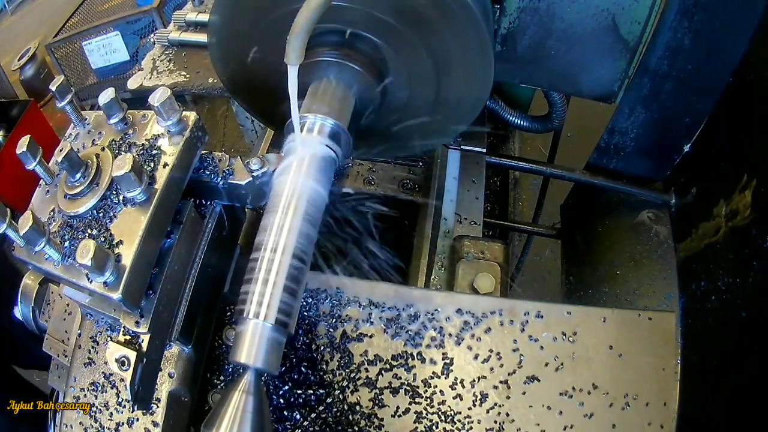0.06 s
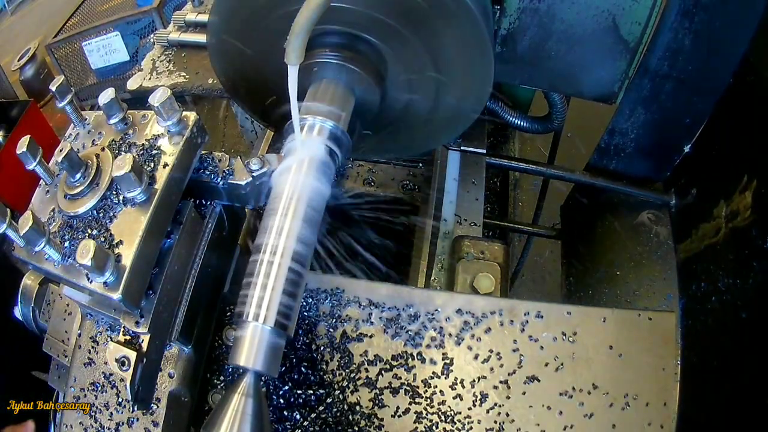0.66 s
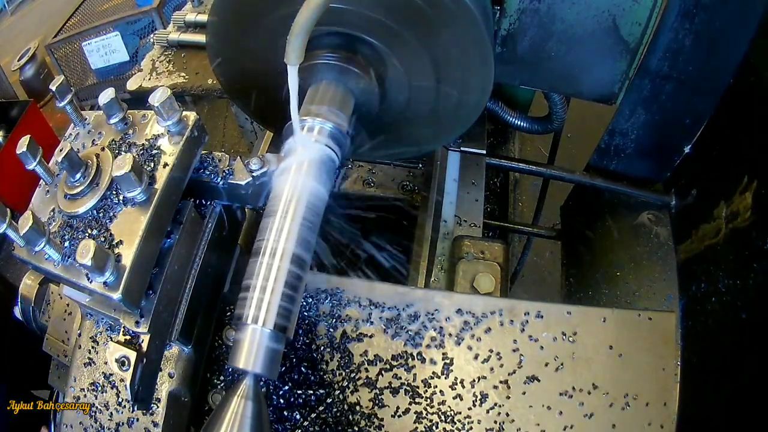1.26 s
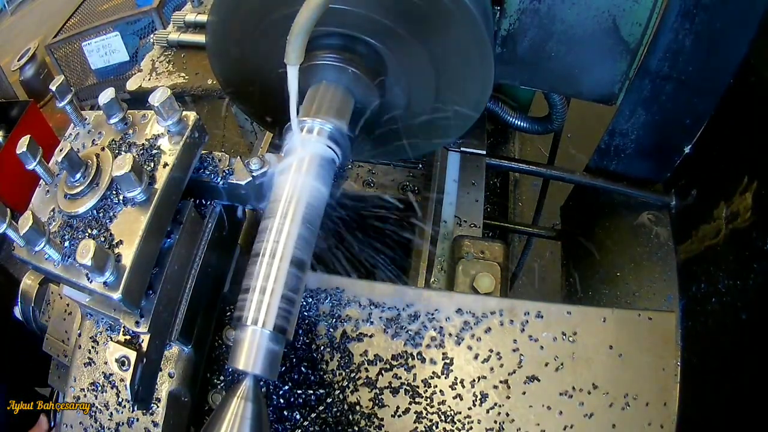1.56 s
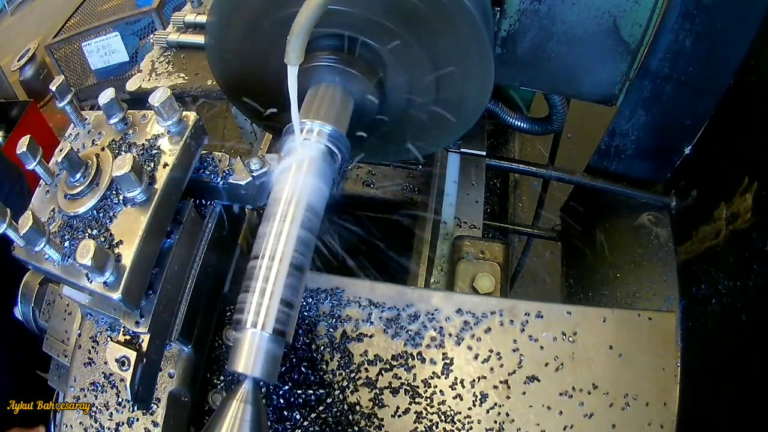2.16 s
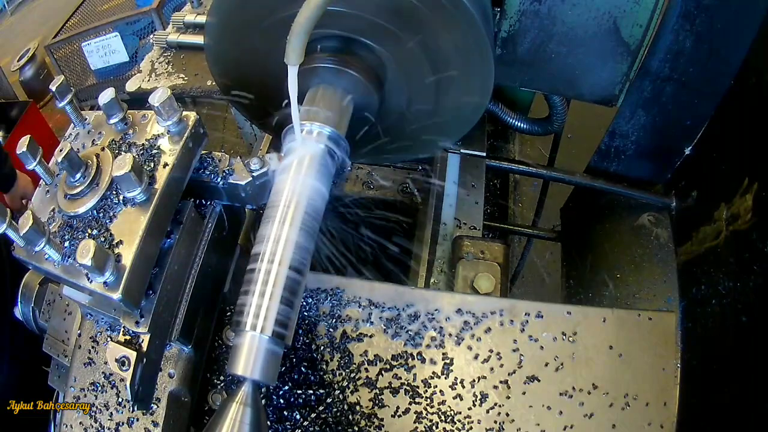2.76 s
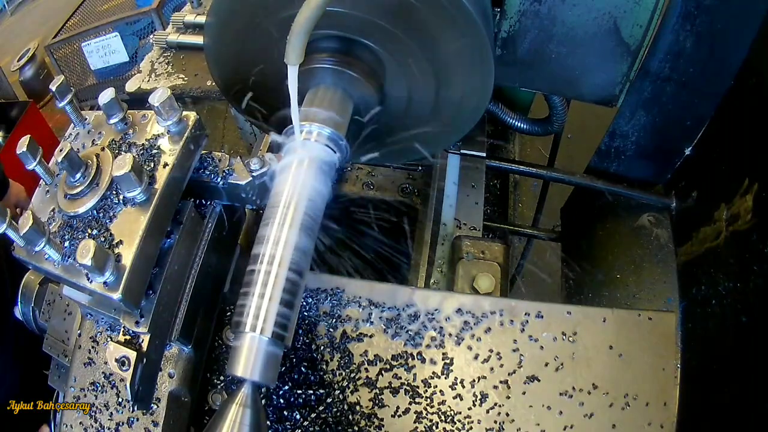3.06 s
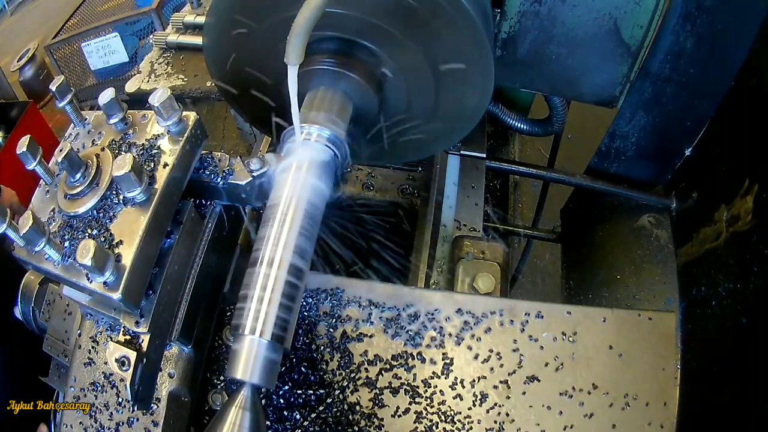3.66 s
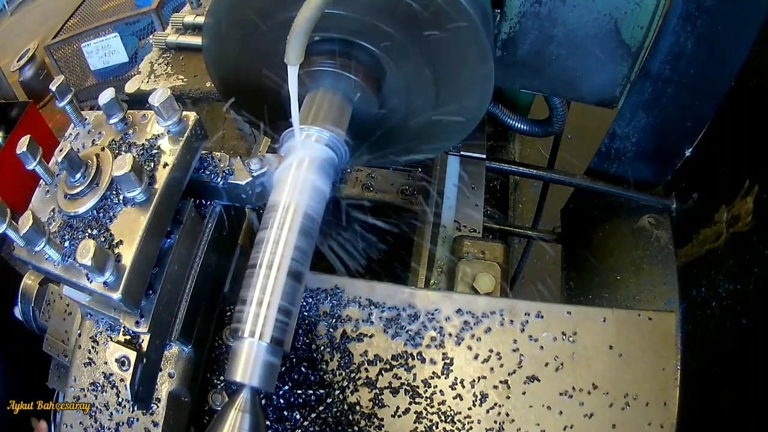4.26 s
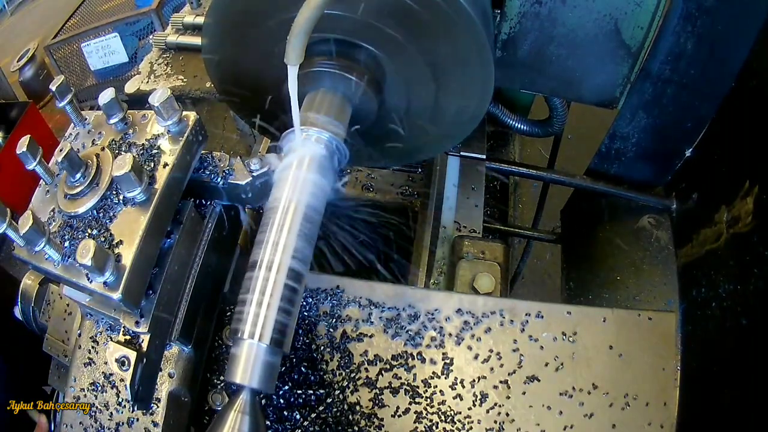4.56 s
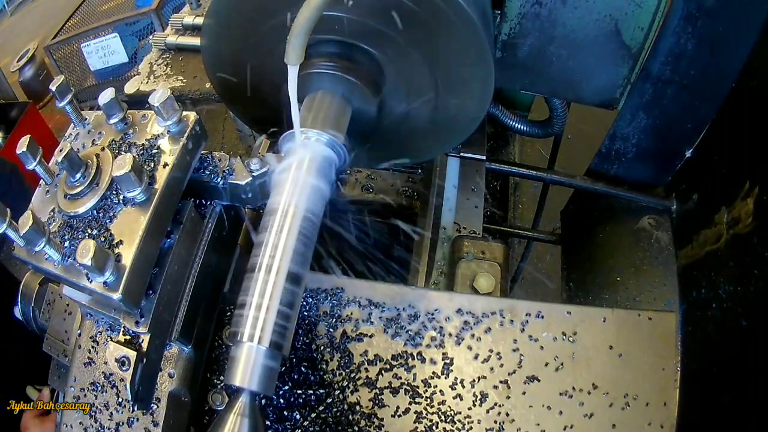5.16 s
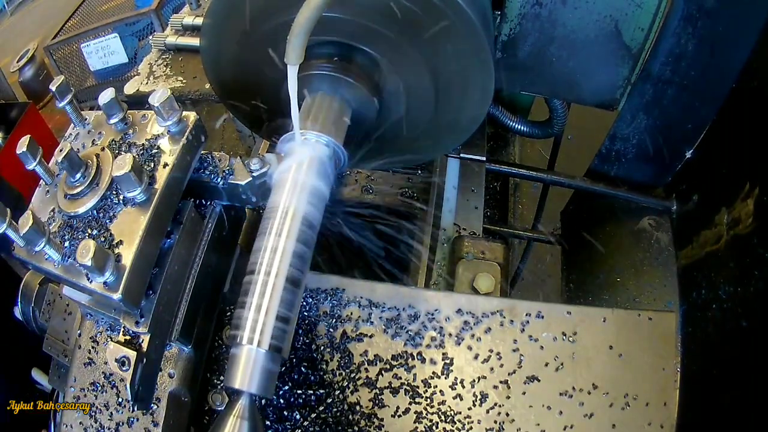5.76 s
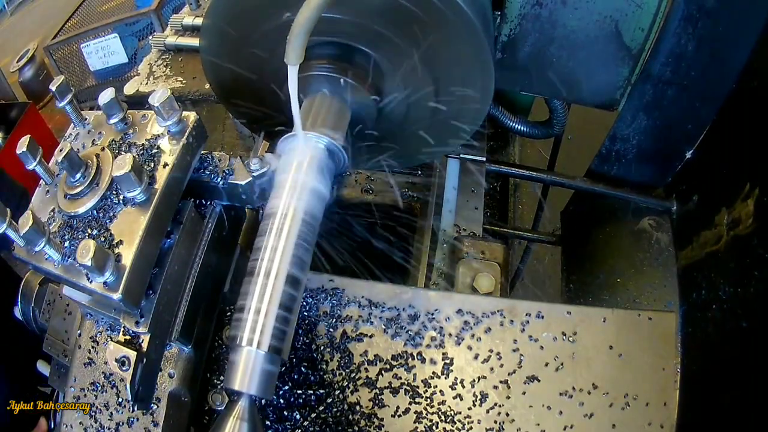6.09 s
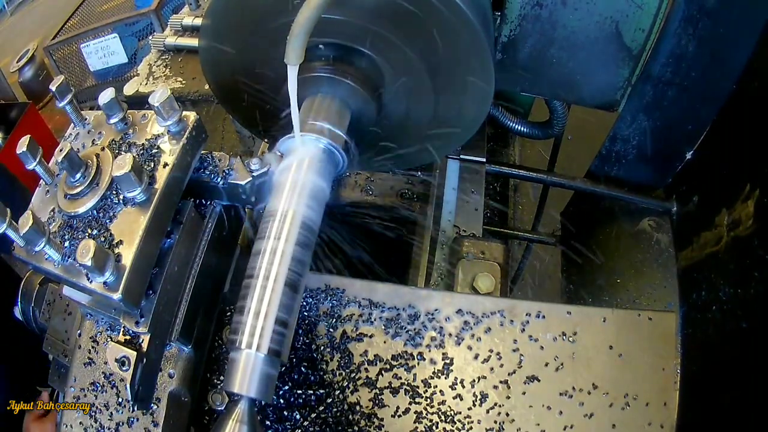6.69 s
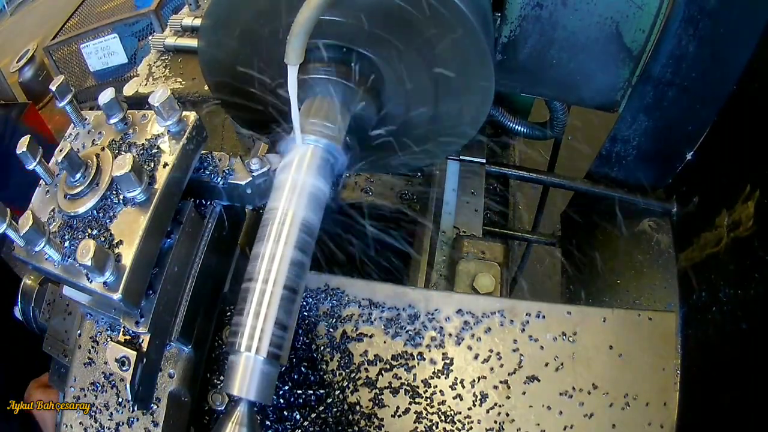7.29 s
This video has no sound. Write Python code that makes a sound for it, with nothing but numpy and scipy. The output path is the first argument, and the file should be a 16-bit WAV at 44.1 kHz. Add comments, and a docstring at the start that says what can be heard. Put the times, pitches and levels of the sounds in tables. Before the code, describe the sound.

A metal lathe turns a steel shaft with a steady gear whine and rattle, then a hoarse squeal and scraping chips near the end.

```python
"""Lathe turning a steel shaft under coolant.

Heard from close above the tool post. The headstock gears whine and rattle, the cut sizzles in the
tool's resonances, coolant hisses and chips tick on the guard. Near the end the thinning chip squeals,
the load eases, the drive speeds up a little and a caught chip scrapes round with the shaft."""
import sys
import numpy as np
from scipy import signal
from scipy.fft import rfft, irfft, next_fast_len
from scipy.io import wavfile
from scipy.ndimage import uniform_filter1d, minimum_filter1d, map_coordinates

SR = 44100
rng = np.random.default_rng(int(sys.argv[2]) if len(sys.argv) > 2 else 0)


def wrap_up_sound(samples):
    """Save the sound to the file named by the first command line argument, as 16-bit audio."""
    columns = np.atleast_2d(samples).T
    # keep every value between -1 and 1, then stretch to whole-number steps
    tamed = np.clip(columns, -1, 1)
    steps = np.round(tamed * 32767).astype(np.int16)
    wavfile.write(sys.argv[1], SR, steps)


N = 332073
SPINDLE_HZ = 13.7

# drive speed: time_s, tooth_rate_hz
DRIVE_SPEED = [(0, 116.75), (6.3, 116.75), (7.1, 117.65), (7.53, 117.65)]
# spray of coolant and fine chips: time_s, relative_db
SPRAY_LEVEL = [(0, -78.5), (5.0, -75.5), (5.95, -69), (6.35, -61.5), (6.85, -60.5), (7.53, -64)]


def amp(db):
    """Decibels to gain."""
    return 10 ** (np.asarray(db) / 20)


def unit(x):
    """Scale to rms 1."""
    return x / np.sqrt(np.mean(x ** 2) + 1e-20)


def noise():
    """White noise, rms 1."""
    return rng.standard_normal(N)


def curves(rows):
    """Per-sample curve for each column after time_s."""
    time_s, *columns = np.transpose(rows)
    return [np.interp(np.arange(N) / SR, time_s, column) for column in columns]


def wobble(rate_hz):
    """Smooth random curve through rate_hz knots a second."""
    knots = rng.standard_normal(int(N * rate_hz / SR) + 4)
    coarse = np.arange(0, N, 16)
    return np.interp(np.arange(N), coarse, map_coordinates(knots, [coarse * rate_hz / SR]))


def crackle(rate_hz, spread_db):
    """Random tiny impacts of uneven size, rms 1."""
    hits = rng.random(N) < rate_hz / SR
    return unit(hits * rng.choice([-1, 1], N) * amp(spread_db * np.minimum(noise(), 2)))


def body(x, response):
    """x through a resonant body (rows of freq_hz, gain_db), scaled to rms 1."""
    freq_hz, gain_db = np.transpose(response)
    size = 16384
    bins_hz = np.fft.rfftfreq(size, 1 / SR)
    gain = amp(np.interp(np.log(bins_hz + 1), np.log(freq_hz), gain_db, right=-110))
    cepstrum = irfft(np.log(gain))
    cepstrum[1:size // 2] *= 2  # fold to minimum phase
    cepstrum[size // 2 + 1:] = 0
    ring = irfft(np.exp(rfft(cepstrum)))
    return unit(signal.fftconvolve(np.pad(x, (size - 1, 0), mode="wrap"), ring, "valid"))


def reflections(x, t60_s, wet_db):
    """Add dense, short echoes from the steel faces all round."""
    t = np.arange(SR // 8) / SR
    tail = rng.standard_normal(len(t)) * amp(-60 * t / t60_s)
    return x + amp(wet_db) * signal.fftconvolve(x, tail / np.linalg.norm(tail))[:N]


def load():
    """Cutting load, 1 to 0; the drive runs slower under it."""
    tooth_hz, = curves(DRIVE_SPEED)
    return np.interp(tooth_hz, [DRIVE_SPEED[0][1], DRIVE_SPEED[-1][1]], [1, 0])


def gear_tone(phase, waver_db):
    """Tone of randomly wavering strength, rms 1."""
    return unit(amp(waver_db * wobble(7)) * np.sin(phase + rng.uniform(0, 2 * np.pi)))


def gear_whine(tooth_phase):
    """Tones geared to one drive: tooth harmonic 4 holds, harmonic 5 throbs and fades with the load."""
    # motor and gear train at cutting speed: pitch_hz, rms_db
    train_tones = [(49.2, -51), (66.1, -58.5), (82.3, -49.5), (98.2, -42), (117.3, -41.5), (281.8, -43),
                   (294.0, -41), (324.4, -34.5), (353.1, -46), (363.4, -43.5), (379.5, -39), (392.7, -30.5),
                   (405.3, -41.5), (454.5, -35), (480.0, -31), (482.4, -31), (503.2, -27), (547.3, -32),
                   (601.6, -30.5), (603.1, -30.5), (605.4, -31), (619.7, -36.5), (648.7, -30.5),
                   (778.4, -40.5), (1131.0, -44), (1152.9, -43), (1167.4, -36), (1297.6, -41),
                   (1401.0, -38.5), (1452.7, -50.5), (1556.8, -46.5), (1621.5, -48.5), (2335.0, -49),
                   (2724.0, -71), (2996.6, -67.5), (3023.5, -65.5), (3050.3, -64.5), (3076.5, -57),
                   (6099.9, -72)]
    # two gears beating with the loudest mesh: offset_hz, first_swell_s
    beats = [(4.071, .094), (-4.919, .124)]
    # those two against the mesh: relative_db
    beat_levels = [-8, -10]
    t = np.arange(N) / SR
    mesh_phase = 5 * tooth_phase + rng.uniform(0, 2 * np.pi)
    neighbours = sum(amp(db) * np.sin(mesh_phase + 2 * np.pi * offset_hz * (t - swell_s))
                     for (offset_hz, swell_s), db in zip(beats, beat_levels))
    mesh_db = -18 - 8.5 * (1 - load()) + .9 * wobble(3)
    mesh = np.sqrt(2) * amp(mesh_db) * (np.sin(mesh_phase) + neighbours)
    held = amp(-21) * gear_tone(4 * tooth_phase, waver_db=.6)
    phase_per_hz = tooth_phase / DRIVE_SPEED[0][1]
    train = sum(amp(db) * gear_tone(hz * phase_per_hz, waver_db=1.5) for hz, db in train_tones)
    return mesh + held + train


def gear_rattle(tooth_phase):
    """Teeth clash in uneven bursts, shaking the casting, its covers and the bed."""
    # headstock casting: freq_hz, gain_db
    casting_response = [(12, -48.5), (28, -31.5), (50, -24.5), (100, -21.5), (135, -23), (200, -15),
                        (265, -16.5), (340, -12), (430, -6.5), (520, -5.5), (600, -1), (690, -10),
                        (790, -20.5), (950, -38.5), (1300, -81)]
    # sheet covers: freq_hz, gain_db
    cover_response = [(600, -40), (830, -8.5), (920, -9), (1060, -6.5), (1160, -0.5), (1320, -3.5),
                      (1520, 0.5), (1680, -15), (1820, -16), (1920, -11), (2150, -10.5), (2340, -14),
                      (2480, -23.5), (3200, -49.5)]
    # lathe bed: freq_hz, gain_db
    bed_response = [(12, -33), (28, -10.5), (48, -3.5), (100, -2.5), (220, 2), (400, -23), (900, -70)]
    clash = amp(2.2 * np.cos(tooth_phase) + 1.4 * wobble(45)) * noise()
    casting = amp(-19.5 + 1.2 * load()) * body(clash, casting_response)
    buzz = amp(.66 * np.cos(tooth_phase) + wobble(60)) * noise()
    covers = amp(-29) * body(buzz, cover_response)
    swell_s, width_s = 6.54, .29  # the bed swells as the cut runs out
    rumble_db = -42.6 + 12 * np.exp(-((np.arange(N) / SR - swell_s) / width_s) ** 2)
    return casting + covers + amp(rumble_db) * body(noise(), bed_response)


def cut():
    """The chip shears off in dense small fractures that ring tool and shaft, harder once a turn."""
    # strength of the cut: time_s, relative_db
    cut_level = [(0, -42), (4.5, -41.5), (6.9, -40.5), (7.02, -45.5), (7.53, -46)]
    # tool and shaft: freq_hz, gain_db
    tool_response = [(1900, -39), (2600, -22), (2780, -16), (2880, -8), (3180, -18), (3380, -9), (3520, 2),
                     (3700, -13), (4050, -4), (4300, -21.5), (4520, -25), (4730, -11), (5350, -27.5),
                     (6250, -24.5), (6900, -35.5), (7400, -43.5), (9000, -45), (15000, -62.5)]
    cut_db, = curves(cut_level)
    runout_db = .7 * np.sin(2 * np.pi * SPINDLE_HZ * np.arange(N) / SR)
    shear = crackle(rate_hz=6000, spread_db=2) * amp(runout_db + .52 * wobble(40))
    return amp(cut_db - 1.75) * body(shear, tool_response)


def coolant_spray():
    """Coolant hisses off the shaft, louder towards the end of the cut."""
    # mist hiss: freq_hz, gain_db
    mist_spectrum = [(2000, -22.5), (4500, 3), (6300, 7.5), (8500, -4), (9600, -3.5), (11800, -0.5),
                     (13000, -10.5), (16000, -18)]
    spray_db, = curves(SPRAY_LEVEL)
    spatter = noise() * amp(1.3 * wobble(25) + wobble(160))
    hiss = reflections(spatter, t60_s=.028, wet_db=-.5)
    return amp(spray_db + 5) * body(hiss, mist_spectrum)


def chip_ring(pitch_hz, t60_s, others_db, count):
    """Ring of one curled chip, energy 1: a main mode and count random ones sharing others_db."""
    t = np.arange(SR // 16) / SR
    others_hz = rng.uniform(3000, 12800, (count, 1))
    gains = amp(others_db) * rng.standard_normal((count, 1)) / np.sqrt(count)
    modes = np.sin(2 * np.pi * pitch_hz * t) + np.sum(gains * np.sin(2 * np.pi * others_hz * t), 0)
    ring = modes * amp(-60 * t / t60_s)
    return ring / np.linalg.norm(ring)


def flying_chips():
    """Fine chips tinkle on the guard, each at its own pitch, ever more often."""
    spray_db, = curves(SPRAY_LEVEL)
    out = np.zeros(N + SR)
    for when, pitch, size in rng.random((600, 3)):
        start = int(np.sqrt(when) * N)
        ring = chip_ring(8400 + 3700 * np.sqrt(pitch), t60_s=.011, others_db=6, count=16)
        level_db = .4 * spray_db[start] - 30 + 16 * size ** 3
        out[start:start + len(ring)] += amp(level_db) * ring
    return reflections(out[:N], t60_s=.08, wet_db=-3)


def chip_contacts(contacts):
    """Gritty bursts of steel on steel, each ringing the chip and knocking the tool post."""
    # rubbing steel chip: freq_hz, gain_db
    grit_spectrum = [(900, -21.5), (2500, -5), (5000, 6.5), (6800, 2), (9000, -10), (12000, -4.5),
                     (13300, -24.5), (15500, -24.5)]
    # tool post: freq_hz, gain_db
    post_response = [(500, -27), (1200, 2), (2200, -0.5), (4000, 1.5), (6500, -11), (8200, -32.5)]
    t = np.arange(SR // 2) / SR
    grit = body(crackle(rate_hz=3700, spread_db=3.5), grit_spectrum)
    post = body(noise(), post_response)
    out = np.zeros(N + SR)
    for start_s, level_db, rise_s, t60_s, pitch_hz, ring_db, knock_db in contacts:
        start = round(start_s * SR)
        rub = np.roll(grit, -start)[:len(t)]
        knock = np.roll(post, -start)[:len(t)]
        modes = chip_ring(pitch_hz, t60_s=.013, others_db=10, count=24)
        ring = unit(signal.fftconvolve(rub, modes)[:len(t)])
        envelope = np.minimum(t / rise_s, 1) * amp(level_db - 60 * np.maximum(t - rise_s, 0) / t60_s)
        burst = amp(-4.5) * rub + amp(ring_db) * ring + amp(knock_db) * knock
        out[start:start + len(t)] += envelope * burst
    return out[:N]


def chip_strikes():
    """Contact rows for free chips striking; a longer contact starts more softly."""
    # single strikes: start_s, level_db, t60_s, pitch_hz, knock_db
    strikes = [(2.11, -60, .08, 7250, -17), (3.724, -50.5, .2, 4000, 16), (4.396, -53, .04, 9030, -16),
               (5.455, -50, .06, 6100, -15), (6.075, -42.5, .13, 5300, -12.5), (6.181, -49, .08, 6200, -12),
               (6.405, -45.5, .22, 7300, -6.5), (6.545, -49, .14, 3950, -8), (6.880, -39, 0.084, 6940, -10),
               (6.912, -29.5, 0.067, 6600, -5), (6.938, -31, .055, 6860, -2), (6.965, -34, .08, 5600, -7),
               (7.391, -42, 0.11, 4750, 11.5), (7.433, -42, .09, 5000, -1), (7.458, -37, .1, 6460, -9),
               (7.483, -41, 0.082, 5400, -8)]
    rise_per_t60, ring_db = .041, -3
    return [(start_s, level_db, rise_per_t60 * t60_s, t60_s, pitch_hz, ring_db, knock_db)
            for start_s, level_db, t60_s, pitch_hz, knock_db in strikes]


def stick_slip(track, harmonic, width_hz):
    """Rough, broken band of stick and slip on one harmonic of a gliding pitch."""
    pitch_hz, level_db = curves(track)
    t = np.arange(N) / SR
    sounding = (t > track[0][0]) & (t < track[-1][0])
    phase = harmonic * 2 * np.pi * np.cumsum(pitch_hz * (1 + .008 * wobble(25))) / SR
    grip = amp(2.8 * wobble(35))
    band = wobble(width_hz) * np.cos(phase) + wobble(width_hz) * np.sin(phase)
    return sounding * amp(level_db) * unit(grip * band)


def chip_squeal():
    """The last of the chip squeals hoarsely, sinking in pitch as it thins."""
    # main squeal: time_s, pitch_hz, level_db
    glide = [(6.16, 5070, -59), (6.28, 4770, -47), (6.41, 4270, -46.5), (6.58, 3900, -49),
             (6.75, 3680, -64)]
    # faint overtones of the chip: time_s, fundamental_hz, level_db
    singing = [(6.25, 2400, -82), (6.42, 2470, -70), (6.68, 2460, -73), (6.90, 2230, -71)]
    overtones = sum(stick_slip(singing, harmonic, width_hz)
                    for harmonic, width_hz in [(3, 430), (4, 350), (5, 350)])
    return stick_slip(glide, harmonic=1, width_hz=950) + overtones


def caught_chip():
    """Contact rows for a caught chip scraping once a turn; it rings less than a free one."""
    first_s, rise_s, t60_s = 7.009, .006, .16
    pitch_hz, ring_db, knock_db = 5760, -4.5, -13
    return [(first_s + turn / SPINDLE_HZ, -40 + 1.5 * force, rise_s, t60_s,
             pitch_hz * np.exp(.07 * curl), ring_db, knock_db)
            for turn, (force, curl) in enumerate(rng.standard_normal((8, 2)))]


def scene():
    """The lathe from one point above the work, mono."""
    tooth_hz, = curves(DRIVE_SPEED)
    tooth_phase = 2 * np.pi * np.cumsum(tooth_hz) / SR + .02 * wobble(3)  # slight drive flutter
    machine = gear_whine(tooth_phase) + gear_rattle(tooth_phase)
    cutting = cut() + coolant_spray()
    chips = flying_chips() + chip_contacts(chip_strikes() + caught_chip()) + chip_squeal()
    return (machine + cutting + chips)[None]


def record(dry):
    """Peak limiter, then the microphone's faint hiss, narrow treble notch and band limit."""
    ceiling, top_hz = .84, 15760
    notch_hz, width_hz, depth_db = 7820, 270, -17.5
    needed_gain = np.minimum(1, ceiling / (np.abs(dry[0]) + 1e-9))
    held_gain = minimum_filter1d(needed_gain, size=800)
    gain = uniform_filter1d(uniform_filter1d(held_gain, size=400), size=400)
    sound = dry[0] * gain + amp(-82) * noise()
    size = next_fast_len(N + SR // 2, True)
    bins_hz = np.fft.rfftfreq(size, 1 / SR)
    notch = amp(depth_db * np.exp(-((bins_hz - notch_hz) / width_hz) ** 2))
    return irfft(rfft(sound, size) * notch * (bins_hz < top_hz), size)[None, :N]


dry = scene()
out = record(dry)
wrap_up_sound(out)
```